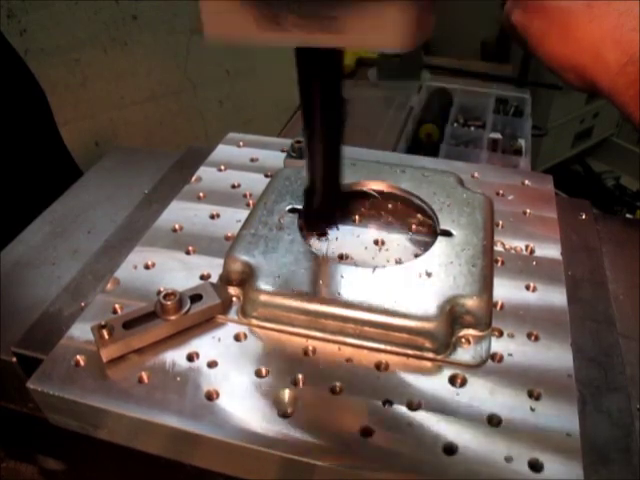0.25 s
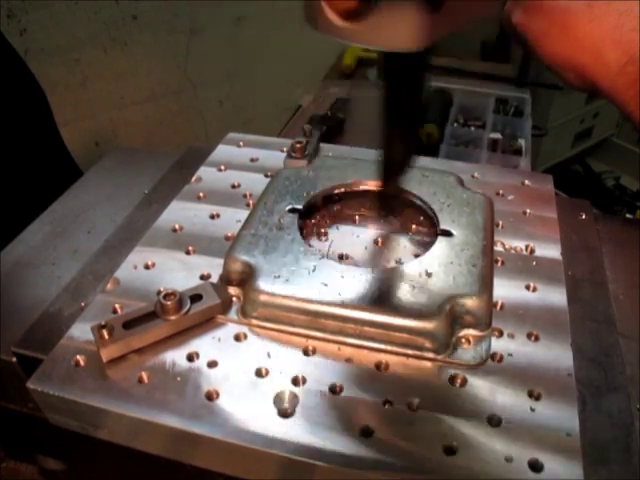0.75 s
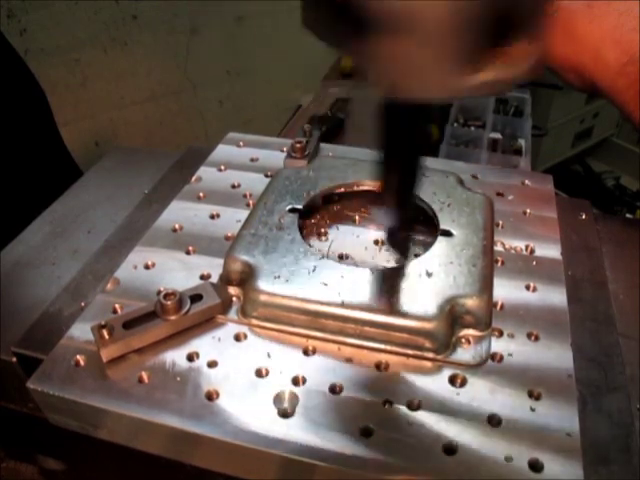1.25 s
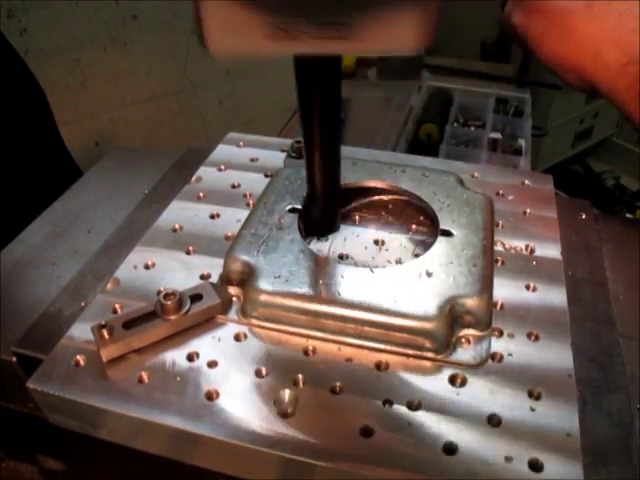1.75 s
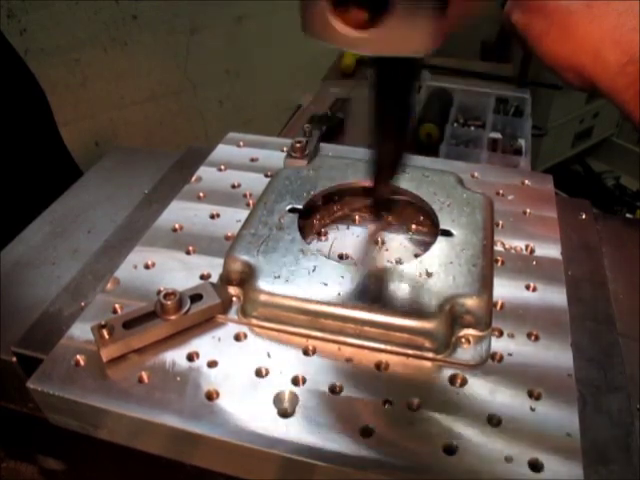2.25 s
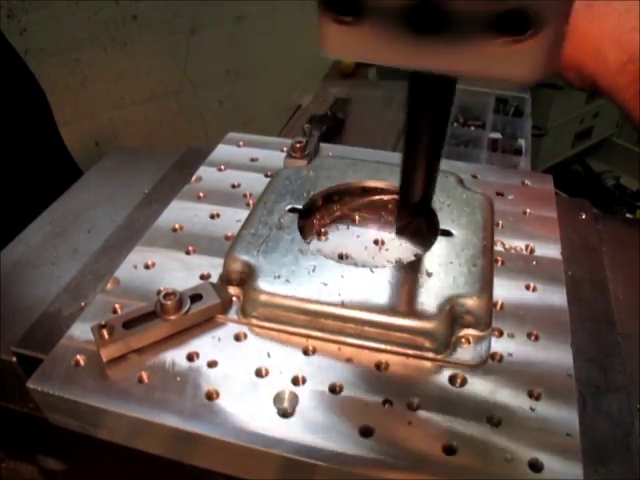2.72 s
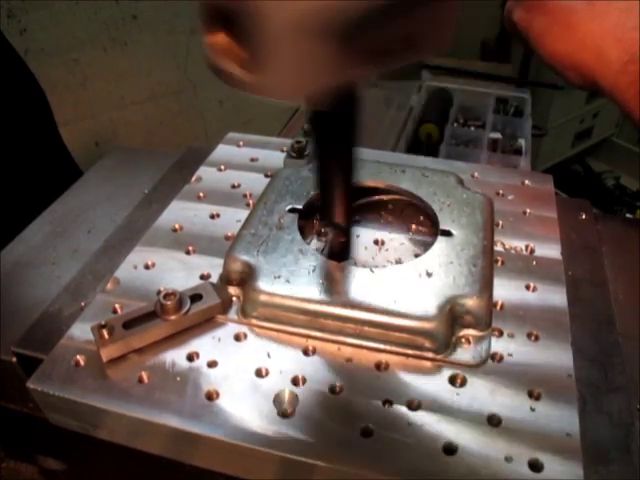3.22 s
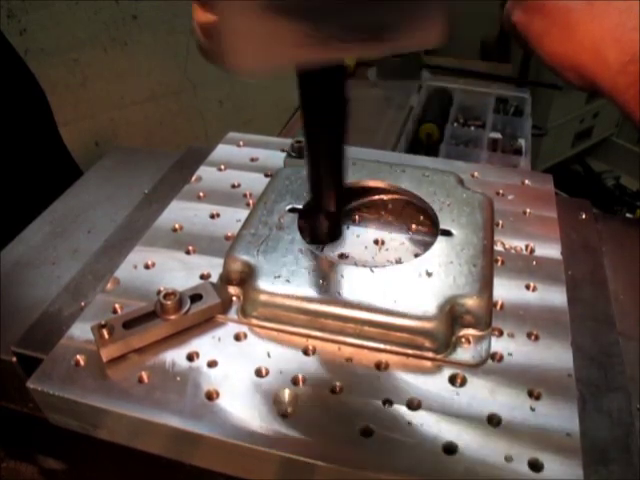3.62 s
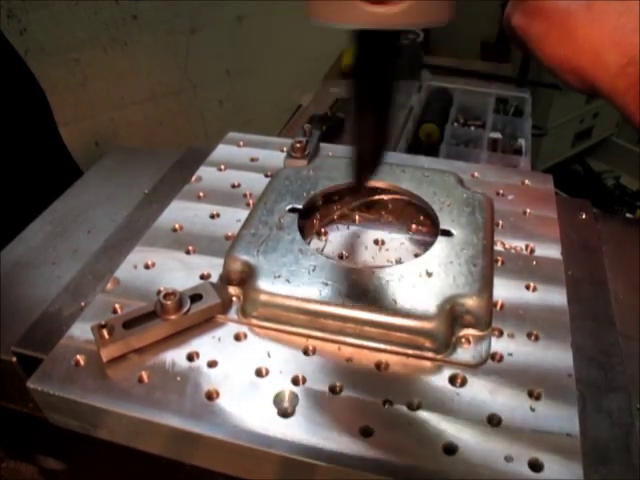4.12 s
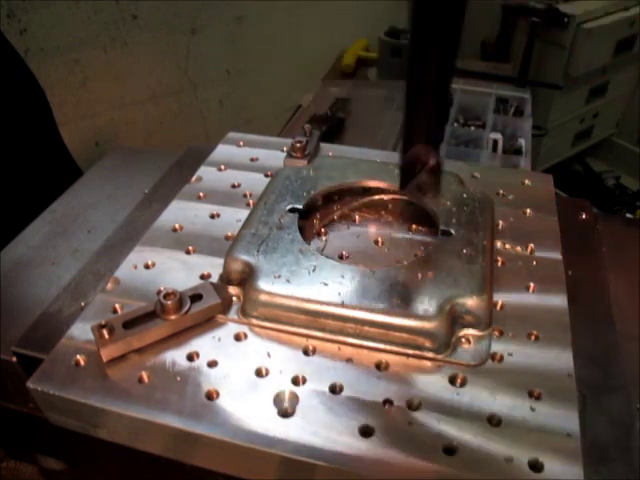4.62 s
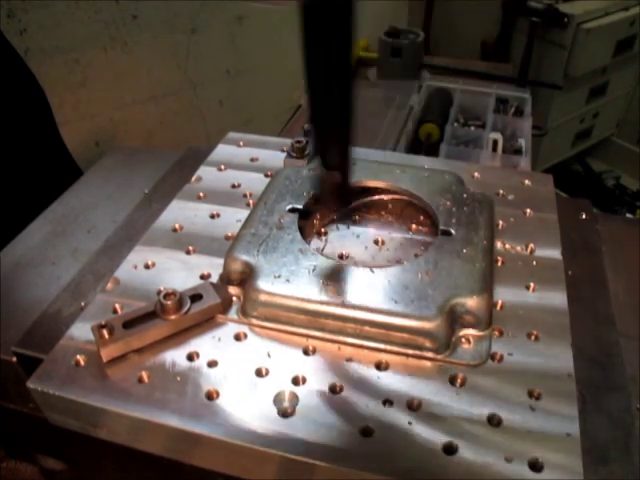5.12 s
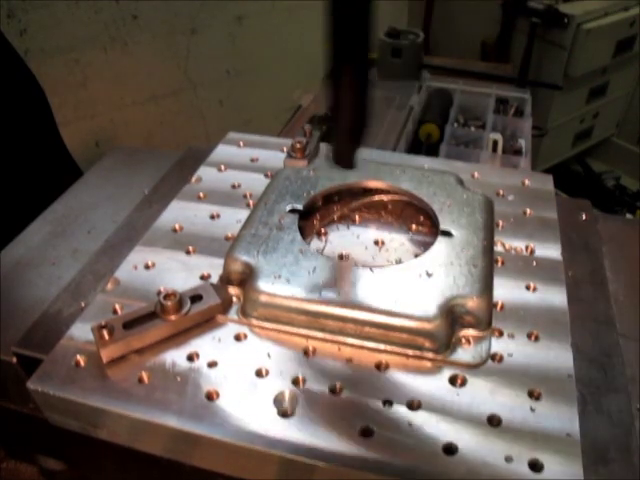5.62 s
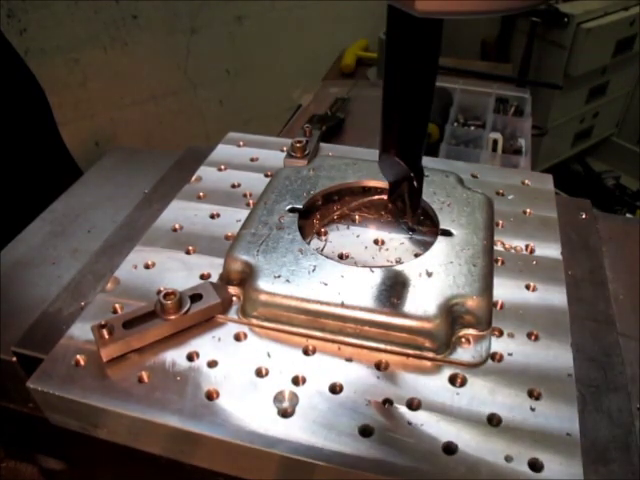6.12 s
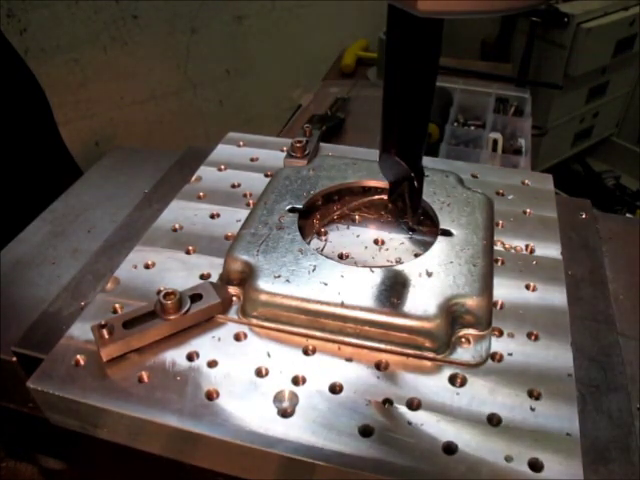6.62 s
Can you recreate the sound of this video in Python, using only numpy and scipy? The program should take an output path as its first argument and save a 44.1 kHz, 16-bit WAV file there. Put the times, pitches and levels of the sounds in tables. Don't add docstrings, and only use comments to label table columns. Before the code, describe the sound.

Close in a workshop, a rotating cutter grabs thin sheet steel in harsh, uneven scrapes with a piercing squeal and metallic ringing. After about four seconds it stops, leaving motor hum and gear whirr. A dry sliding hiss and a clink follow, then the motor switches off, its whine drops quickly, and tiny metal pieces tinkle. A small close microphone makes the background swell as the cutting fades.

```python
import sys
import numpy as np
from scipy import signal
from scipy.fft import rfft, irfft, next_fast_len
from scipy.io import wavfile

SR = 44100
rng = np.random.default_rng(int(sys.argv[2]) if len(sys.argv) > 2 else 0)


def boost(x):
    u = np.asarray(x, float) / 20
    return 10 ** u


def generate_wav(signal):
    frames = np.transpose(np.atleast_2d(signal))
    scaled = np.clip(frames, -1, 1) * 32767
    pcm = np.round(scaled).astype(np.int16)
    wavfile.write(sys.argv[1], SR, pcm)


N = 302526
TIME_S = np.arange(N) / SR

# time_s, gain_db
MICROPHONE_GAIN = [(0, -8.5), (.48, -6), (.6, -9), (1.02, -13), (1.7, -14), (1.9, -11.5), (3.47, -5.5),
                   (3.86, -5.5), (4.78, -3), (5.4, 1), (5.668, 3)]


def rms_one(x):
    return x / np.sqrt(np.mean(x ** 2) + 1e-20)


def in_time(rows):
    time_s, *columns = np.transpose(rows)
    return [np.interp(TIME_S, time_s, column) for column in columns]


def drift(rate_hz):
    r = np.exp(-40 * np.pi * rate_hz / SR)
    white = rng.standard_normal(N // 20 + 2002)
    slow = signal.lfilter([1], [1, -2 * r, r * r], white)[2000:]
    return np.interp(np.arange(N) / 20, np.arange(len(slow)), rms_one(slow))


def colour(x, spectrum):
    hz, level_db = np.transpose(spectrum)
    grid_hz = np.arange(1, N // 2 + 2) * SR / N
    gain_db = np.interp(np.log(grid_hz), np.log(hz), level_db, -120, -120)
    return rms_one(irfft(rfft(x) * boost(gain_db), N))


def resonate(x, hz, width_hz):
    r = np.exp(-np.pi * max(width_hz, 1) / SR)
    zeros = np.array([1, 0, -1]) * (1 - r * r) / 2
    return signal.lfilter(zeros, [1, -2 * r * np.cos(2 * np.pi * hz / SR), r * r], x + 1e-18)


def dying(start_s, peak_db, t60_s, rise_s=0.00039):
    out = np.zeros(N)
    t60_s = max(t60_s, .004)
    first = int(start_s * SR) + 1
    since = np.arange(first, min(first + int(2 * t60_s * SR), N)) / SR - start_s
    out[first:first + len(since)] = boost(peak_db - 60 * since / t60_s) * np.minimum(since / rise_s, 1)
    return out


def cut():
    # start_s, peak_db, sheet flex_db re peak, burst t60_s
    snatches = [(0.0905, -14, -4, 0.036), (0.248, 0, -2, 0.029), (0.5781, -4.5, -26.5, 0.031),
                (0.7537, -3, -23, 0.035), (0.893, 0, -35, 0.024), (1.0093, -5, 2.5, 0.032),
                (1.045, -14.5, -7, 0.096), (1.082, -3.5, 7, 0.066), (1.188, 6, -10, 0.037),
                (1.225, -2, -25, 0.06), (1.458, 0.5, -4, 0.059), (1.56, -1.5, 3, 0.035),
                (1.615, -3, -8.5, 0.049), (1.9305, -7, -8, 0.027), (1.977, -18, -1, 0.074),
                (2.004, 0.5, -4, 0.09), (2.3964, 2.5, -15, 0.048), (2.426, 6.5, -13.5, 0.038),
                (2.4684, 1, -21, 0.071), (2.7623, 4.5, -16, 0.049), (2.8145, -4, 1, 0.021),
                (2.8469, 2, -15, 0.055), (3.1562, -5, -13, 0.05), (3.19, 7, -6, 0.022),
                (3.223, 3, -21, 0.067), (3.5148, 0, -3.5, 0.057), (3.5694, 4, -31, 0.064),
                (3.6586, -3.5, 2, 0.047), (3.688, -6, 5, 0.041), (3.904, -2, 4, 0.029)]
    # pitch_hz, level_db per Hz
    scrape_spectrum = [(760, 2), (1300, 5.5), (1580, -22), (2810, 8), (3570, -16.5), (4010, -104),
                       (4690, 20.5), (6680, -11), (9040, 18), (14900, -25), (15700, -52)]
    high, low, bar = contact()
    for start_s, peak_db, flex_db, t60_s in snatches:
        burst = dying(start_s, peak_db - 12, t60_s, rise_s=.007)
        high = high + burst
        low = low + burst * boost(min(flex_db, 1))
        bar = bar + burst * boost(-10.5)
    chips = (rng.random(N) < 11000 / SR) * boost(2.88 * rng.exponential(1, N)) * rng.choice([-1, 1], N)
    force = rms_one(chips) * boost(2.2 * drift(48))
    knock, crack, long_ring = burr_knocks()
    scrape = high * boost(-3.5) * colour(force, scrape_spectrum)
    ringing = ring_steel(force, high, low, knock)
    return scrape + knock * crack + boost(29) * squeal(force * bar) + ringing + long_ring


def contact():
    # start_s, contact_s, scrape_db, sheet flex_db re scrape, squeal_db re scrape
    passes = [(0.0, .13, -19, -2.5, -17), (.13, 0.11, -22.5, -6, -15), (0.273, 0.25, -19, -4, -15),
              (.5, .13, -25.5, -1.7, -9), (.654, .165, -22.5, -5, -18), (0.842, 0.073, -23.5, -4, -14),
              (0.956, 0.0068, -24, -3, -13), (1.09, 0.14, -30, -10, -18), (1.18, 0.097, -30.5, 1.4, -15),
              (1.365, 0.015, -33.5, -2.5, -9), (1.529, 0.14, -33, -8.5, -16),
              (1.758, 0.0059, -34, -15, -18), (1.892, 0.028, -37, -11, -2), (1.965, 0.09, -29, -12, -4),
              (2.08, 0.046, -27.5, -18, -7.5), (2.259, 0.017, -31.5, -8.5, -15),
              (2.389, 0.079, -24, -6.5, -11), (2.62, 0.031, -33, -8, -7.5), (2.763, .13, -31.5, -11, -19),
              (2.993, 0.037, -30, -12.5, -2.5), (3.142, 0.11, -27, -14.5, -10),
              (3.375, 0.053, -30, -8.5, -7), (3.509, 0.11, -23, -5.5, -5.5),
              (3.658, .288, -23.5, -7, -17.5)]
    bite_s = 0.0034
    light_bite = 0.47
    swell_db_per_s, lift_db_per_s = 4, 283
    break_through = 1.7
    gains = np.zeros((3, N))
    for start_s, hold_s, scrape_db, flex_db, squeal_db in passes:
        span = slice(int(start_s * SR), int((start_s + hold_s) * SR + SR / 2))
        since = TIME_S[span] - start_s
        lift = lift_db_per_s * (break_through if start_s == passes[-1][0] else 1)
        level_db = scrape_db + swell_db_per_s * since - lift * np.maximum(since - hold_s, 0)
        rise_s = bite_s * boost(light_bite * (-35 - scrape_db))
        bite = np.clip(since / rise_s + (start_s == 0), 0, 1)
        balance = boost(np.array([[0], [flex_db], [squeal_db]]))
        gains[:, span] = np.maximum(gains[:, span], bite * boost(level_db) * balance)
    return gains


def ring_steel(force, high, low, knock):
    steel_hz = [1580, 1640, 1800, 1910, 2110, 2250, 2330, 2480, 3040, 3480, 3640, 4700, 5230, 5745, 6330,
                6840, 7360, 7910, 8350, 8690, 8862, 9182, 9650, 10200, 10555, 11000, 12300, 13600]
    # width_hz, level_db
    steel_modes = [(39.6, 5.5), (55.556, 2), (77.6, -2), (61, -7), (66.6, -3.5), (46.296, -2), (54.6, 1.5),
                   (76.4, -5.5), (111, -11), (59.7, -5.5), (78, -8), (167, -17), (55.556, -25), (59, -7.5),
                   (74.074, -24), (61.56, -15.5), (111, -10.5), (216, -12.5), (50, -13.5), (70, -15),
                   (19.6, -1.5), (25, -36), (30, -17), (50, -31), (48.6, -10.5), (70, -17), (110, -36),
                   (237.6, -32)]
    sheet_lag = 900
    out = np.zeros(N)
    for k, (hz, (width_hz, level_db)) in enumerate(zip(steel_hz, steel_modes)):
        is_sheet = hz < 4000
        drive = low * boost(18.5) if is_sheet else high * boost(20.0)
        flare_db = level_db + 1.9 * drift(27.4) + 2.5 * drift(2.83)
        drive = (drive + knock * boost(8.0)) * boost(flare_db)
        out += (-1) ** k * resonate(np.roll(force, sheet_lag * is_sheet) * drive, hz, width_hz)
    return out


def burr_knocks():
    # start_s, peak_db, long bar ring_db
    knocks = [(.358, -14, -44), (.578, -5, -44), (.7712, -2.5, -40), (.845, -14, -44), (.895, -6.5, -40),
              (1.094, -14, -27), (1.461, -7, -26), (3.225, -15, -44), (3.571, -7, -38), (3.661, -15, -44),
              (3.908, -8, -38)]
    ring_hz, ring_t60_s = 3445, .45
    blow = sum(dying(s, peak_db - 6, .022, rise_s=.0001) for s, peak_db, ring_db in knocks)
    crack_spectrum = [(1200, -3), (3000, -13.5), (9000, 4), (12000, -10), (16000, -26)]
    crack = colour(rng.standard_normal(N), crack_spectrum)
    ring = sum(dying(s, ring_db, ring_t60_s, rise_s=0.0016) for s, peak_db, ring_db in knocks)
    return blow, crack, ring * np.sin(2 * np.pi * ring_hz * TIME_S)


def squeal(force):
    # multiple, level_db
    overtones = [(1, 0.5), (2, 2.5), (3, -7), (4, -20)]
    squeal_hz, width_hz = 3662, 9.1
    swing = signal.hilbert(resonate(force, squeal_hz, width_hz), next_fast_len(N))[:N]
    size, phase = np.abs(swing), np.angle(swing)
    out = np.zeros(N)
    for multiple, level_db in overtones:
        out += size * boost(level_db + 1.4 * drift(2.7)) * np.cos(round(multiple) * phase)
    return out


def clinks():
    # start_s, peak_db, ring pitch_hz, ring t60_s, thud_db re peak
    clink_hits = [(4.567, -19, 2760, 0.029, -8), (5.3005, -10, 7600, 0.053, -13),
                  (5.673, -19.5, 3110, 0.077, -2.5), (6.0924, -27, 3230, 0.048, 1),
                  (6.304, -29, 7700, 0.036, -12), (6.3098, -42, 8100, 0.031, -28),
                  (6.3154, -23, 7900, 0.035, -30), (6.3316, -41, 10000, 0.008, -37),
                  (6.435, -26, 9200, 0.038, -13.5), (6.4694, -35, 9750, 0.04, -19),
                  (6.542, -30.5, 9020, 0.13, -14.5), (6.6014, -30.5, 5540, 0.044, -18),
                  (6.6472, -28.5, 9660, 0.075, -18), (6.6897, -29, 9900, 0.045, -31),
                  (6.801, -26, 9440, 0.11, -14), (6.8405, -24, 7950, 0.075, -15)]
    white = rng.standard_normal(N)
    crack = colour(white, [(2000, 1), (4000, 4.5), (9500, 3.0), (12000, -8), (15800, -22)])
    thud = colour(white, [(90, 7), (300, -2.0), (900, -9.5), (2200, -6.5)])
    out = np.zeros(N)
    for start_s, peak_db, hz, t60_s, thud_db in clink_hits:
        out += dying(start_s, peak_db - 8, 0.69 * t60_s) * crack
        out += dying(start_s, peak_db + thud_db - 0.5, 2.2 * t60_s) * thud
        out += dying(start_s, peak_db - 6.5, 0.48 * t60_s) * np.sin(2 * np.pi * hz * (TIME_S - start_s))
    return out + slug(white) + bumps()


def slug(white):
    # pitch_hz, level_db, t60_s
    disc_modes = [(4915, -2, .11), (6300, -12, .04), (7780, -1, .09), (9570, -7, .04), (9950, -3, .035),
                  (11900, -19, .09), (13200, -22, .025), (14300, -22, .035), (15200, -27, .025)]
    # start_s, level_db, hardness_db per octave
    disc_hits = [
        (6.309, -27, -3),
        (6.332, -19, 36),
    ]
    tick = colour(white, [(3500, -15), (5000, -8), (10000, 5.0), (15800, -18)])
    out = np.zeros(N)
    ends_s = [disc_hits[1][0], TIME_S[-1]]
    for (start_s, hit_db, hard_db), end_s in zip(disc_hits, ends_s):
        for hz, level_db, t60_s in disc_modes:
            mode_db = hit_db - 3 + level_db + hard_db * min(np.log2(hz / 9000), .15)
            ring = np.sin(2 * np.pi * hz * (TIME_S - start_s)) * (TIME_S < end_s)
            out += dying(start_s, mode_db, t60_s) * ring
        out += dying(start_s, hit_db - 5 + hard_db / 9, .025) * tick
    return out


def bumps():
    # start_s, pitch_hz, level_db, t60_s
    dull_bumps = [
        (4.56, 132.5, -21, 0.25),
        (5.861, 197, -30, .9),
        (5.99, 726, -37, 0.66),
        (6.29, 1150, -40, 0.17),
        (6.63, 1010, -46, 0.14),
        (6.8, 398, -45, .3),
        (6.811, 230, -43.5, .3),
        (6.83, 1100, -45, .15),
    ]
    out = np.zeros(N)
    for start_s, hz, level_db, t60_s in dull_bumps:
        tone = np.sin(2 * np.pi * hz * (TIME_S - start_s))
        out += dying(start_s, level_db, t60_s, rise_s=0.0078) * tone
    return out


def slide():
    # time_s, hiss level_db
    push = [(4.27, -48), (4.55, -43), (4.66, -47), (4.72, -38.5), (5.03, -40), (5.12, -43.5), (5.75, -38.5),
            (5.92, -50), (6.12, -54), (6.31, -46.5), (6.74, -50), (6.86, -43)]
    # pitch_hz, level_db per Hz
    hiss_spectrum = [(2940, -21), (5000, 7), (5660, 6), (7090, 3.5), (8190, 13), (10400, 9), (11000, 3),
                     (12000, -4.5), (15700, -21)]
    # pitch_hz, level_db per Hz
    air_spectrum = [(710, -37), (1200, -11), (1600, 8), (4360, 2), (6160, -14), (6860, 1), (7080, 1),
                    (9890, -1.5), (15700, -27)]
    shop_db, brake_db = -53.5, -39
    brake_s, brake_hold_s = 5.66, .24
    hiss = colour(rng.standard_normal(N), hiss_spectrum) * boost(in_time(push)[0] + 1.7 * drift(6.1))
    since = TIME_S - brake_s
    rub = np.clip(np.minimum(since / 0.049, (brake_hold_s - since) / .05 + 1), 0, 1)
    air_gain = boost(shop_db) + boost(brake_db) * rub
    return hiss + air_gain * colour(rng.standard_normal(N), air_spectrum) * boost(1.2 * drift(7.6))


def machine():
    gain_db, = in_time(MICROPHONE_GAIN)
    coast_s = np.maximum(TIME_S - 5.71, 0)
    return motor_hum(gain_db, coast_s) + gear_noise(gain_db, coast_s) + table_shakes()


def motor_hum(gain_db, coast_s):
    # time_s, hum level_db
    lurches = [
        (6.04, -26),
        (6.235, -31.5),
    ]
    lurch_s, hum_hz = 0.066, 55.9
    hum_db, fade_db_per_s, rest_db = -22.5, 30, -43.5
    gain = boost(hum_db + gain_db - fade_db_per_s * coast_s * (1.5 + coast_s)) + boost(rest_db) * (coast_s > 0)
    for time_s, level_db in lurches:
        gain += boost(level_db) * np.exp(-((TIME_S - time_s) / lurch_s) ** 2)
    phase = 2 * np.pi * np.cumsum(hum_hz + 1.373 * drift(3.07)) / SR
    return np.sqrt(2) * np.sin(phase) * gain * boost(.5 * drift(5.1))


def gear_noise(gain_db, coast_s):
    # pitch_hz, level_db per Hz
    gear_spectrum = [(41, -34), (70, -32), (87, -10), (143, -13), (327, -16.5), (454, -12), (500, -18.5),
                     (763, -17), (1000, -16.5), (1100, -23), (1190, -18.5), (1960, -22.5), (2430, -30),
                     (3430, -29), (7000, -39.5), (9100, -58), (15400, -120)]
    # pitch_hz, width_hz, level_db re gears
    housing = [(139, 7.7, -12), (189, 24, -9), (363.2, 2.3, -11), (458.3, 5.9, -3.5), (601, 24, -11.5),
               (702.6, 6.2, -10), (846, 0.9, -15), (1184, 16, -11), (3380, 130, -14.5), (3544, 21, -17)]
    # time_s, pitch_hz
    mesh_fall = [
        (5.3, 1016.5),
        (5.47, 985),
        (5.64, 935),
        (5.71, 880),
        (5.79, 700),
        (5.84, 605),
        (5.9, 590),
        (6.0, 400),
    ]
    gears_db, fade_db_per_s, rest_db = -29.5, 28.5, -50
    follow = 0.66
    mesh_db, unloaded_db, mesh_gone_s = -4, 6.5, 5.85
    slack_hz, rattle = 60, 3.2
    mesh_hz, = in_time(mesh_fall)
    speed = mesh_hz / mesh_hz[0]
    white = rng.standard_normal(N)
    noise = colour(white, gear_spectrum) * boost(0.5 + 0.74 * drift(37))
    for hz, width_hz, level_db in housing:
        ring = rms_one(resonate(white, hz, width_hz))
        noise += speed ** 3 * boost(level_db - 6 + 0.6 * drift(3.3)) * ring
    loose = np.sqrt(np.abs(1 - speed))
    tone_db = mesh_db + unloaded_db * loose - 250 * np.maximum(TIME_S - mesh_gone_s, 0)
    wander_hz = (3 + slack_hz * loose * speed) * drift(52.4)
    mesh = np.sin(2 * np.pi * np.cumsum(mesh_hz + wander_hz) / SR) * boost(tone_db + 1.3 * drift(41))
    mesh *= 1 - loose + rattle * loose * drift(80)
    level_db = np.maximum(gears_db + follow * gain_db - fade_db_per_s * coast_s, rest_db)
    return boost(level_db) * (noise + mesh)


def table_shakes():
    # start_s, level_db
    shakes = [
        (.64, -44),
        (2.5, -39),
        (3.62, -37),
        (4.14, -25),
        (5.37, -21),
    ]
    band = signal.butter(2, [13, 40], "band", fs=SR, output="sos")
    rumble = rms_one(signal.sosfilt(band, rng.standard_normal(N)))
    swell = sum(dying(start_s, level_db, 1.5, rise_s=0.057) for start_s, level_db in shakes)
    return (boost(-41.5) + swell) * rumble


def scene():
    return (cut() + machine() + slide() + clinks())[None]


def roll_off(x):
    return signal.sosfilt(signal.butter(12, 15850, fs=SR, output="sos"), x)


def record(dry):
    top_cut = signal.ellip(12, .3, 60, 15750, fs=SR, output="sos")
    rounded = 0.86 * np.tanh(dry / 1.053)
    return roll_off(signal.sosfilt(top_cut, rounded))


dry = scene()
out = record(dry)
generate_wav(out)
```